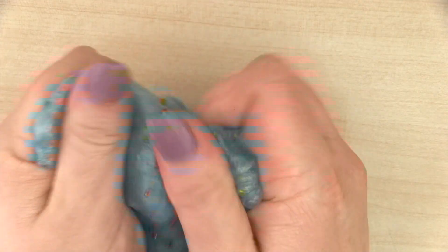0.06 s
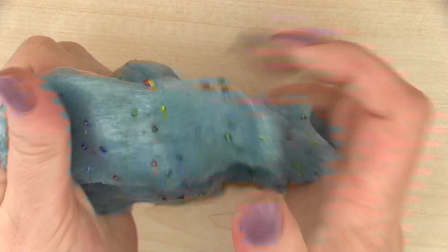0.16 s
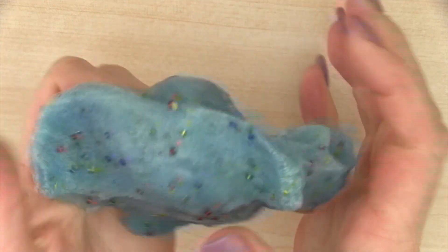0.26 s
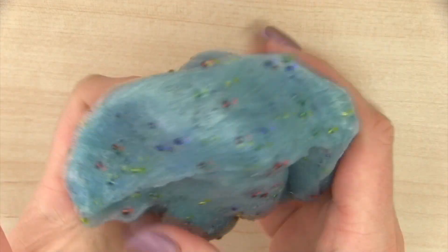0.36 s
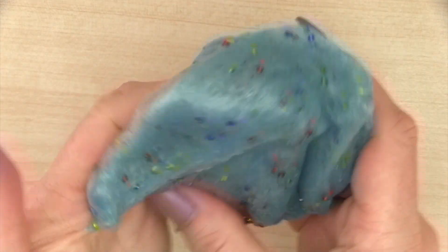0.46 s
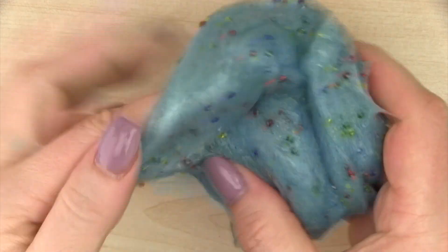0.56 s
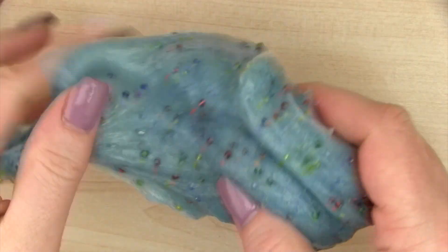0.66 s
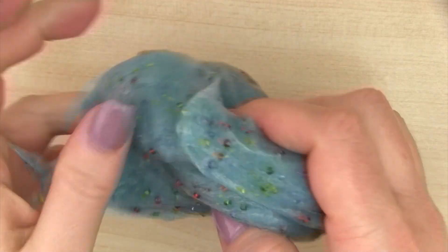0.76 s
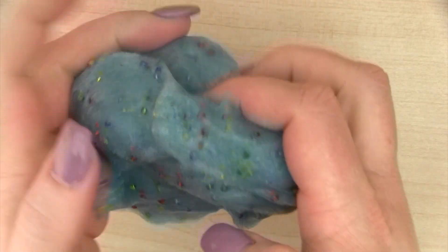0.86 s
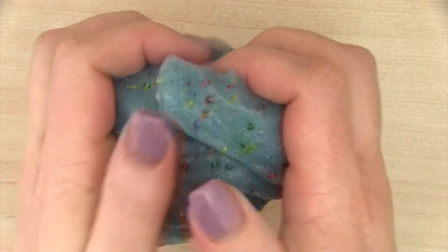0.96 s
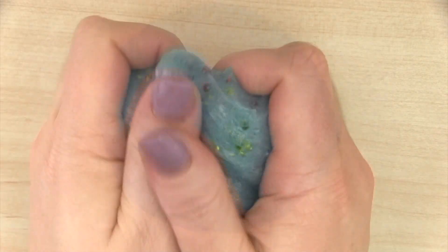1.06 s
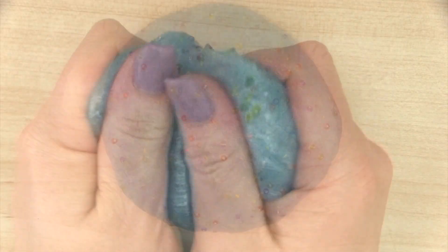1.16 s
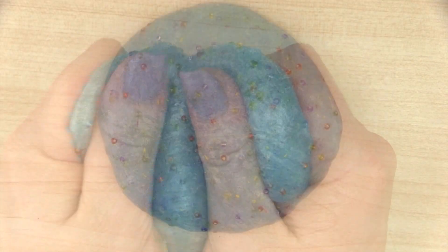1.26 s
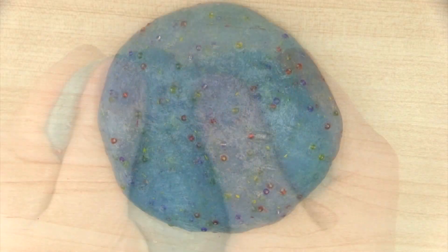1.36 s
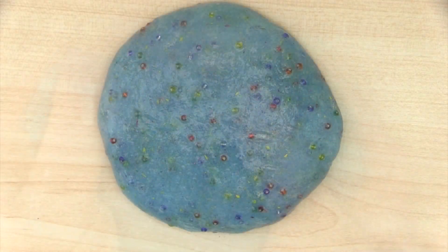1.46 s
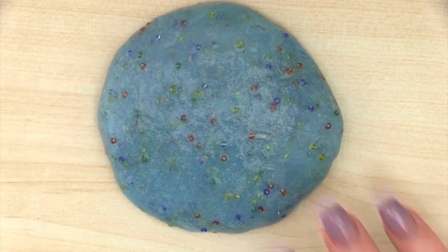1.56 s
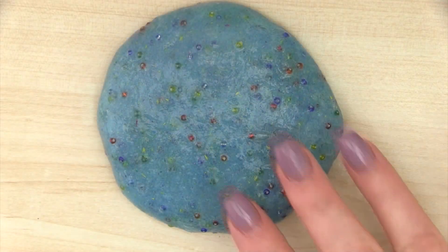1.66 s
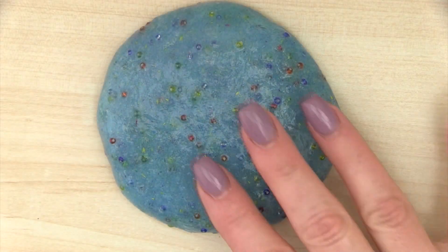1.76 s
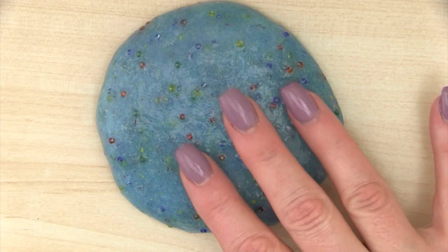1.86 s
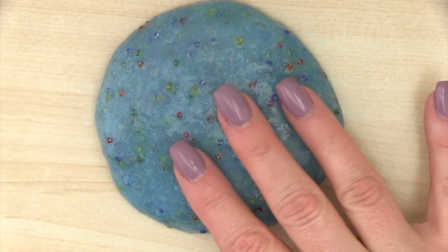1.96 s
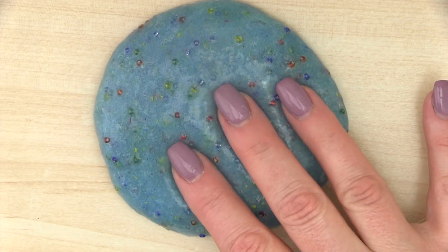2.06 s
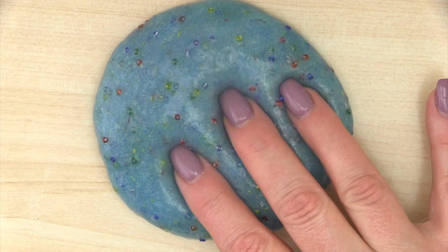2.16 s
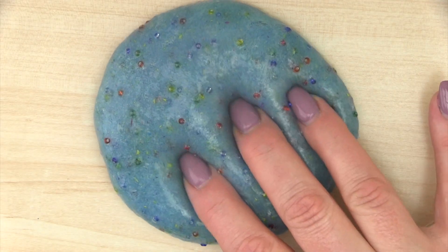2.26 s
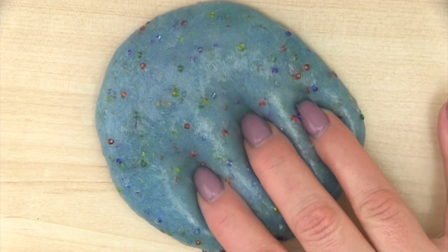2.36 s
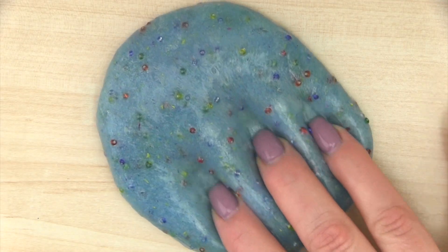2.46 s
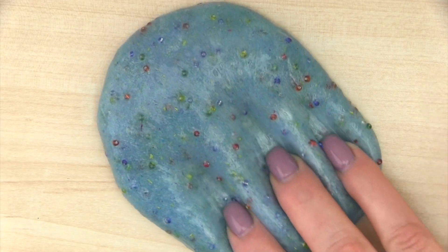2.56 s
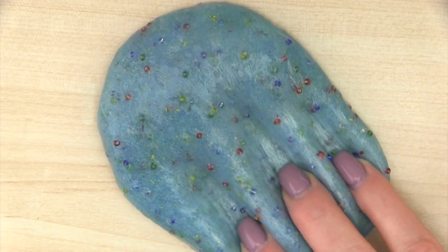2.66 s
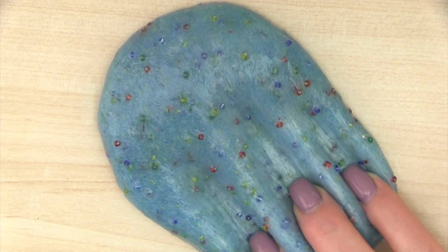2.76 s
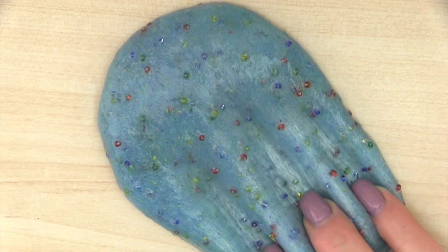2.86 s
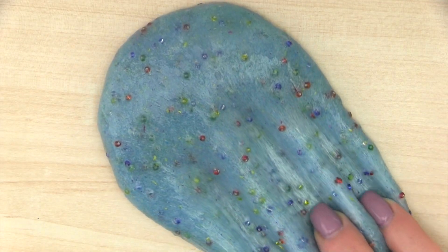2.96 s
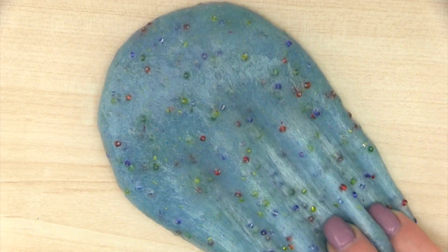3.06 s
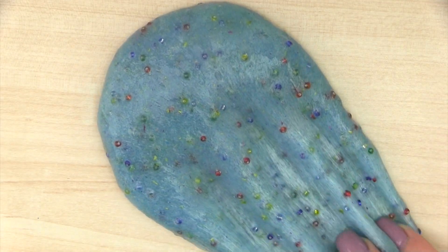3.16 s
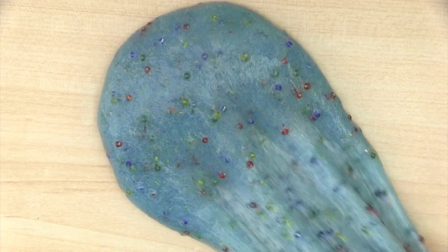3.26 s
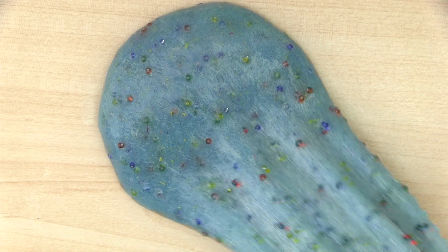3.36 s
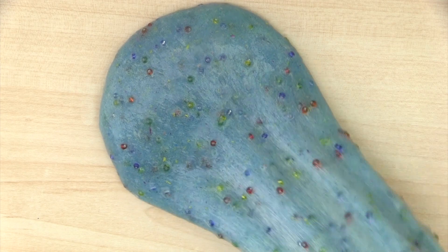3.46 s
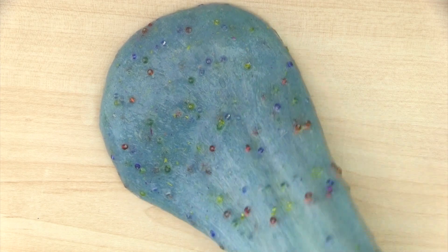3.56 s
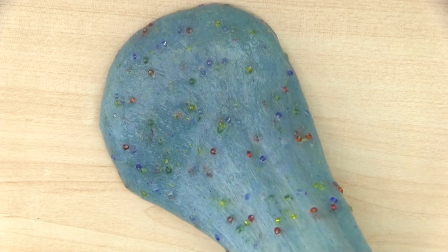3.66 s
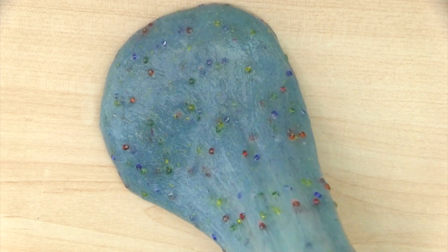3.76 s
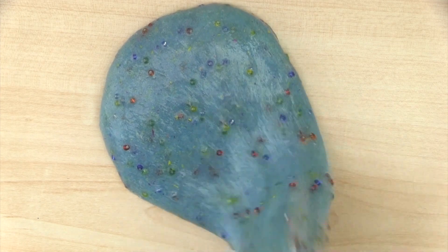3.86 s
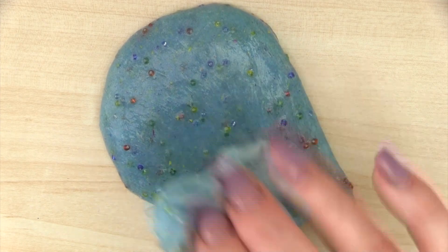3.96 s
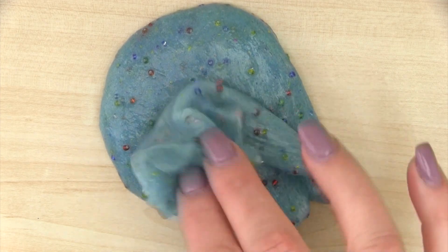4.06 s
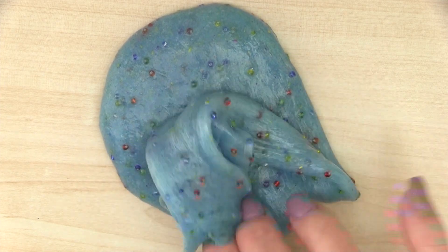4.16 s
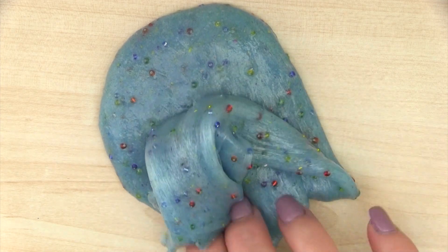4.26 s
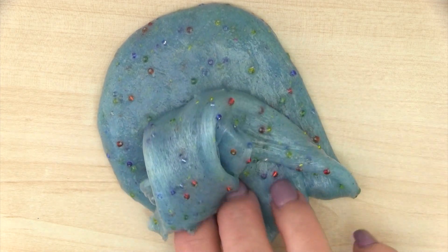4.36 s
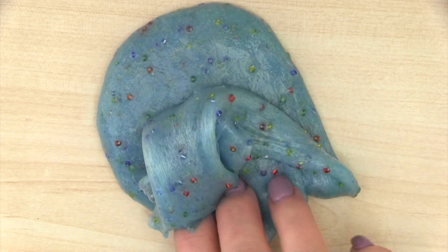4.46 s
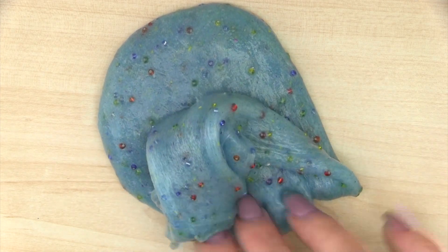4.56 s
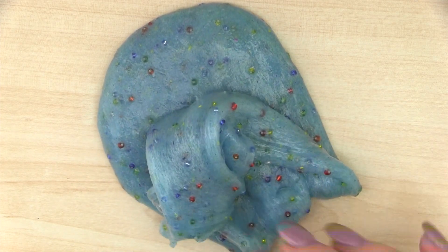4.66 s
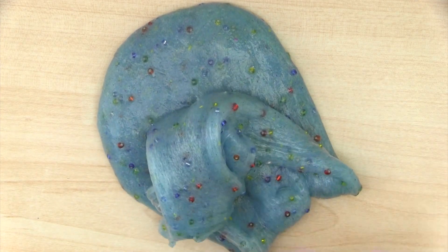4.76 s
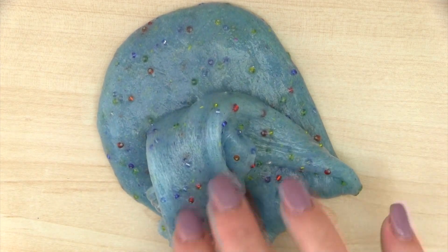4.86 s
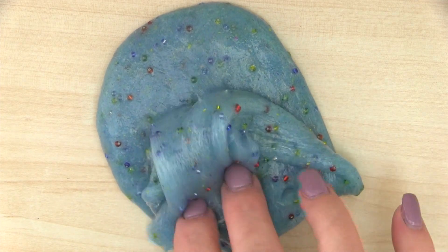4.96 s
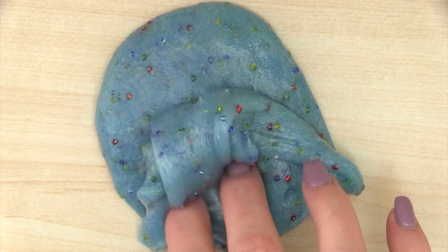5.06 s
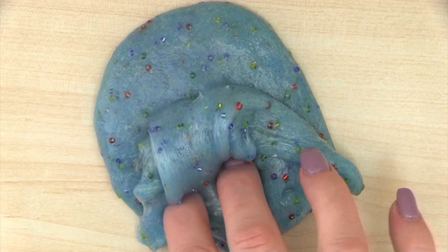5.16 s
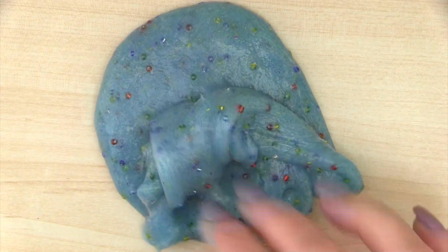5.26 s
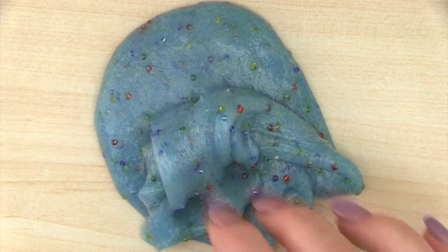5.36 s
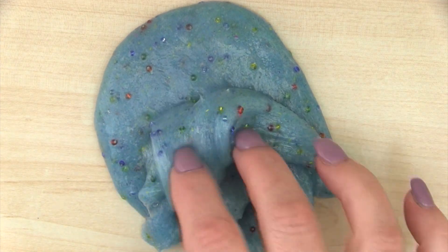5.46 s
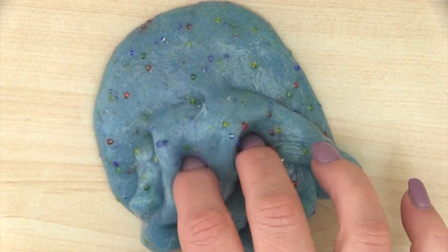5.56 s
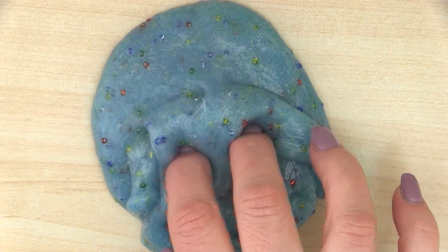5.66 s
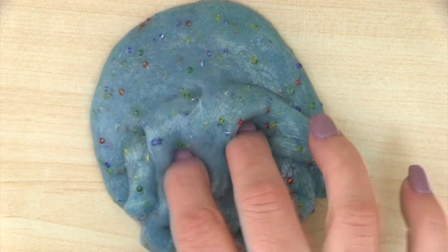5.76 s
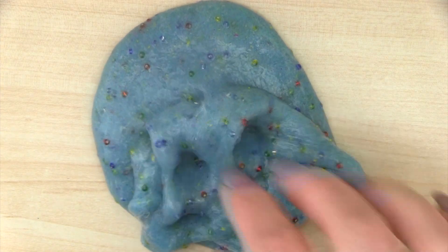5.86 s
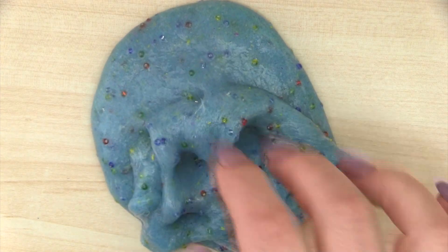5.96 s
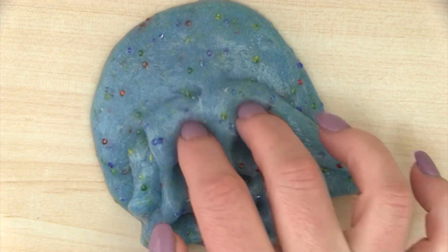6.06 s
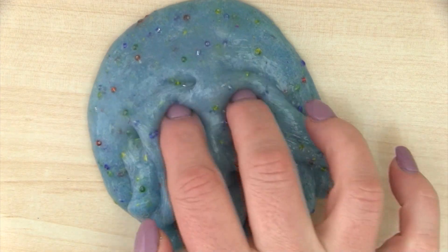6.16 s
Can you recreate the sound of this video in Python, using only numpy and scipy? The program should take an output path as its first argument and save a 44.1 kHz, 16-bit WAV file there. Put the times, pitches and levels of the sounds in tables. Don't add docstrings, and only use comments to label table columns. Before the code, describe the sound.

Close-up beaded slime kneaded in the hands with sharp wet pops and crackles, then quietly stretched and poked on a wooden table.

```python
import sys
import numpy as np
from scipy import signal
from scipy.fft import rfft, irfft, next_fast_len
from scipy.io import wavfile
from scipy.ndimage import uniform_filter1d, map_coordinates

SR = 44100
rng = np.random.default_rng(int(sys.argv[2]) if len(sys.argv) > 2 else 0)


def boost(x):
    u = np.asarray(x, float) / 20
    return 10 ** u


def store_wav(level_fs):
    pcm = np.round(np.clip(np.atleast_2d(level_fs), -1, 1) * 32767)
    wavfile.write(sys.argv[1], SR, pcm.T.astype(np.int16))


N = 274743


def unit(x):
    return x / np.sqrt(np.mean(x ** 2) + 1e-20)


def peaked(rows, db):
    return boost(db)[:, None] * rows / np.abs(rows).max(1, keepdims=True)


def along(points, hz):
    f, v = np.transpose(points)
    return np.interp(np.log(hz + 1), np.log(f + 1), v)


def coloured(x, spectrum):
    m = next_fast_len(N + 8192)
    gain = boost(along(spectrum, np.fft.rfftfreq(m, 1 / SR)))
    return irfft(rfft(x, m) * gain, m)[:N]


def wobble(rate):
    knots = rng.standard_normal(int(N * rate / SR) + 4)
    return map_coordinates(knots, [np.arange(N) * rate / SR])


def resonance(hz, centre_hz, sharpness):
    centre = centre_hz[:, None]
    damping = 1j * hz * centre / sharpness
    return damping / (centre ** 2 - hz ** 2 + damping)


def placed(s, wave):
    where = np.round(s * SR).astype(int)[:, None] + np.arange(wave.shape[1])
    return np.bincount(where.ravel(), wave.ravel(), N + SR)[:N]


# f/Hz, density/dB
AIR_SPECTRUM = [(12, -33), (20, -5.5), (60, -3.5), (81, -7.5), (124, -3.5), (160, -12), (211, -5.5),
                (272, -14), (859, -23.5), (988, -23), (1830, -26), (11700, -28.5), (15000, -29.5),
                (16400, -32.5)]
# f/Hz, density/dB
APART_SPECTRUM = [(12, -29.5), (20, 2.5), (280, -9), (322, -9), (450, -11), (13800, -19.5), (16400, -28)]


def air():
    mains_hz = 60
    common = boost(-69 + 1.1 * wobble(2.1)) * unit(coloured(rng.standard_normal(N), AIR_SPECTRUM))
    hum = boost(-70.5 + 2.32 * wobble(8.4)) * np.sin(2 * np.pi * mains_hz * np.arange(N) / SR)
    apart = boost(-77.0) * unit(coloured(rng.standard_normal(N), APART_SPECTRUM))
    return common + hum + np.array([apart, -apart])


# f/Hz, t60/s
ROOM_DECAY = [(300, 0.74), (1500, .25), (3500, 0.41), (7000, 0.08), (14000, 0.076)]
# f/Hz, level/dB
ROOM_COLOUR = [(150, -39), (350, -2), (1500, -4.5), (3500, -5), (7000, -4.5), (14000, -14)]
# delay/s, level/dB
REFLECTIONS = [(.0022, -21.5), (.0035, -19), (.0046, -14.5), (.0087, -25.5)]


def room(x):
    out, step = np.zeros(N + SR), SR // 10
    smear_decay = boost(-60 * np.arange(120) / SR / .0012)
    for start in range(0, N, step):
        hz, t, z = signal.stft(rng.standard_normal(SR // 4), SR, nperseg=128)
        hz = hz[:, None]
        fade = boost(along(ROOM_COLOUR, hz) - 60 * t / along(ROOM_DECAY, hz))
        fade += boost(12.0 - 60 * t * (1 + hz / 6000) / 0.077) * (hz > 500)
        tail = signal.istft(z * fade, SR, nperseg=128)[1]
        tail *= boost(-10.0) / np.linalg.norm(tail)
        for delay, db in REFLECTIONS:
            smear = rng.standard_normal(120) * smear_decay
            tail[round(delay * SR):][:120] += boost(db) * smear / np.linalg.norm(smear)
        wet = signal.fftconvolve(x[start:start + step], tail)
        out[start + 30:][:len(wet)] += wet
    return out[:N]


# f/Hz, t60/s
TABLE_MODES = [(208, 0.13), (130.85, 0.056), (29.56, 0.2018)]
# t/s, rise/s, top level/dB, frame level/dB, sway level/dB
TABLE_PUSHES = [(0.027, 0.0052, -53, -47.5, -58), (0.201, 0.0091, -59, -48, -66),
                (0.661, 0.018, -74, -41, -65), (4.108, 0.011, -70.5, -58.5, -55.5),
                (4.345, 0.0064, -60.5, -57.5, -70), (4.707, 0.048, -25, -21, -47),
                (5.361, 0.011, -50, -37.5, -49), (5.38, 0.033, -31.5, -22.5, -44),
                (5.52, 0.042, -76, -71, -49), (5.6, 0.034, -71, -67, -47.5),
                (5.709, 0.034, -72.5, -62.5, -59), (5.82, 0.037, -69.5, -68, -56),
                (5.953, 0.0066, -45.5, -37, -46), (5.985, 0.019, -51, -29.5, -69.5),
                (6.015, 0.02, -60, -37.5, -68), (6.05, 0.024, -67, -43, -70),
                (6.091, 0.037, -70.5, -57, -58)]


def table_pushes():
    out, t = np.zeros(N + SR), np.arange(SR // 2) / SR
    for s, rise, *levels_db in TABLE_PUSHES:
        swell = 1 - np.exp(-(t / rise) ** 2)
        ring = 0
        for db, (hz, t60) in zip(levels_db, TABLE_MODES):
            ring = ring + boost(db + 5 - 60 * t / t60) * np.sin(2 * np.pi * hz * t)
        out[round(s * SR):][:len(t)] += swell * ring
    return out[:N]


# f/Hz, t60/s
SUCTION_MODES = [(310, 0.03), (380, 0.059), (440, 0.02), (530, 0.027)]
# t/s, rise/s, level/dB
AIR_GULPS = [(0.029, 0.0034, -29.5), (0.197, 0.014, -36.5), (.66, 0.03, -45), (.94, .011, -60),
             (1.188, 0.001, -41.5), (1.212, 0.0082, -41.5), (1.251, 0.0021, -53), (1.288, .0032, -59),
             (2.368, 0.01, -50), (4.695, 0.0082, -34), (4.716, 0.011, -32), (4.745, .025, -39.5),
             (5.361, 0.0071, -32), (5.375, 0.0053, -31.5), (5.41, 0.017, -36), (5.895, 0.0038, -48.5),
             (5.949, 0.0092, -29), (5.982, 0.0034, -50), (6.01, .02, -53)]


def suction_gulps():
    out, t = np.zeros(N + SR), np.arange(SR // 2) / SR
    for s, rise, suction_db in AIR_GULPS:
        swell = 1 - np.exp(-(t / rise) ** 2)
        luck = rng.standard_normal((len(SUCTION_MODES), 3))
        for (hz, t60), (pitch, size, phase) in zip(SUCTION_MODES, luck):
            fade = boost(suction_db - 3.5 + 3.2 * size - 60 * t / t60)
            gulp = fade * np.sin(2 * np.pi * hz * np.exp(.06 * pitch) * t + 2 * phase)
            out[round(s * SR):][:len(t)] += swell * gulp
    return out[:N]


# t/s, hold/s, release for 30 dB/s, level/dB, wetness/dB (squelch up, fizz down)
KNEADING_TEARS = [(0, 0.00096, 0.071, -39, 4), (0.03, 0.005, 0.11, -40.5, 2.5),
                  (.06, 0.0089, 0.2, -57.5, 0), (0.162, 0.06, 0.29, -55.5, 2),
                  (0.239, 0.074, 0.069, -63, 5.5), (.31, 0.024, 0.086, -80, 19),
                  (0.339, 0.045, 0.044, -69, 4.5), (.55, 0.092, 0.095, -66.5, 3),
                  (0.612, 0.076, 0.083, -61.5, 6), (.7, 0.072, 0.13, -71.5, 7.5),
                  (.77, 0.038, 0.32, -66, 3), (.84, 0.1, 0.088, -67, 1), (0.93, 0.034, 0.067, -61.5, 7),
                  (0.999, 0.029, 0.26, -71.5, -0.5), (1.189, 0.02, 0.14, -60, -1.5),
                  (1.234, 0.0089, 0.11, -53, 6), (1.288, 0.0092, 0.085, -47, -0.5)]
# t/s, hold/s, release for 30 dB/s, level/dB, wetness/dB
POKING_TEARS = [(2.33, 0.064, 0.095, -81, 11.5), (3.14, 0.059, 0.29, -70, -8), (3.25, 0.11, .3, -70.5, 4),
                (3.333, 0.0082, 0.2, -69, -2), (3.338, 0.22, 0.17, -74.5, 7.5), (3.5, .05, 0.48, -76, -6),
                (4.04, 0.068, 0.34, -70, 1), (4.179, 0.027, .25, -74.5, 2.5),
                (4.345, 0.0055, 0.068, -82.5, 17.5), (4.659, 0.021, .05, -63.5, 6.5),
                (4.695, 0.0084, 0.06, -52, -2), (4.721, 0.013, 0.078, -69, 11),
                (5.325, 0.011, 0.098, -74.5, 13.5), (5.366, 0.0074, 0.069, -52, 1),
                (5.895, 0.034, 0.045, -75, 10), (5.95, 0.0041, 0.044, -45, -5.5),
                (5.985, 0.022, 0.13, -75, 9)]


def pulls():
    rest_db, fizz_db, squelch_db = -83.5, -3, -2.5
    linger_db, linger = -22, 4.1
    release_speed = np.array([[1], [1.7], [1.7]])
    power = np.full((3, N + SR), boost(rest_db) ** 2)
    t = np.arange(SR) / SR
    for s, hold, release, db, wet_db in KNEADING_TEARS + POKING_TEARS:
        grip = np.minimum(1, t / (.003 + .4 * hold)) ** 2
        gone = np.maximum(0, t - hold) / release * release_speed
        shape = grip * (boost(-30 * gone) + boost(linger_db - 30 * gone / linger))
        levels_db = [[db], [db + fizz_db - wet_db], [db + squelch_db + wet_db]]
        power[:, round(s * SR):][:, :SR] += (boost(levels_db) * shape) ** 2
    return np.sqrt(power[:, :N])


def threads(spectrum, rate, spread_db, smooth, patchy_db):
    snap = rng.random(N) < rate / SR * boost(2.5 * wobble(90))
    size = rng.choice([-1, 1], N) * boost(spread_db * np.minimum(rng.exponential(1, N), 4))
    grains = unit(snap * size) + smooth * rng.standard_normal(N)
    z = signal.stft(grains, nperseg=128)[2]
    field = uniform_filter1d(rng.standard_normal(z.shape), size=3, axis=0)
    field = uniform_filter1d(field, size=5, axis=1)
    patchy = signal.istft(z * boost(patchy_db * unit(field)), nperseg=128)[1][:N]
    return unit(coloured(patchy, spectrum))


# f/Hz, level/dB
CRACKLE_SPECTRUM = [(1400, -24.5), (2200, -6.5), (3000, -5), (3650, 0.5), (4500, -6.5), (6000, -7.5),
                    (10000, -21)]
# f/Hz, level/dB
FIZZ_SPECTRUM = [(4000, -25), (6800, 0), (9000, -2), (13000, -4.5), (15500, -8), (17000, -24)]
# f/Hz, level/dB
SQUELCH_SPECTRUM = [(180, -17.5), (330, -6), (700, -6.5), (1200, -3), (1900, -9), (2400, -8.5), (3200, -19)]


def tearing():
    crackle_gain, fizz_gain, squelch_gain = pulls()
    clumps = .55 * wobble(110)
    crackle = crackle_gain * boost(3 * clumps) * threads(CRACKLE_SPECTRUM, 2600, 2.6, 0.97, 2.6)
    fizz = fizz_gain * boost(1.5 * clumps) * threads(FIZZ_SPECTRUM, 2000, 3.4, .6, 2.2)
    squelch = squelch_gain * boost(0.71 * clumps) * threads(SQUELCH_SPECTRUM, 2100, 2.5, 2.8, 5.2)
    return crackle + fizz + squelch


# t/s,
# f/Hz, level/dB, sharpness/1
SLIME_RINGS = [(.0002, 6800, -24, 0.32), (0.0154, 5570, -29, 1.5), (.0235, 7200, -18, 2.2),
               (0.0295, 2385, -8, 1.75), (0.0291, 3398, 0, 1.6), (0.031, 1480, -15, 2.05),
               (0.0506, 8530, -13, 4.2), (0.0504, 11700, -20, 3.2), (.207, 2100, -40.5, 4.5),
               (.2305, 3500, -42.5, 7.6), (.306, 4440, -41, 3.3), (.792, 1560, -51, 2.2),
               (.8, 4700, -51, 3), (.818, 2500, -50, 4.7), (.885, 4700, -45.5, 3.5),
               (1.171, 3140, -52, 2.3), (1.1883, 960, -47.5, 0.67), (1.1887, 2400, -40, 2.4),
               (1.1886, 3460, -20, 3.6), (1.29, 12470, -8.5, 2.6), (1.2889, 2890, -23, 1.8),
               (1.3897, 11500, -20.5, 3), (1.24, 4600, -34, 4), (1.2545, 3810, -27, 2.2),
               (1.281, 7530, -44, 3), (1.2846, 1785, -36, 1.4), (1.3155, 5840, -37, 1.4),
               (3.218, 3700, -51.5, 4), (3.246, 1186, -59.5, 3.3), (3.278, 1244, -56, 1.9),
               (3.334, 1194, -41, 1.74), (3.392, 1510, -55, 3), (3.415, 1300, -58, 2),
               (3.447, 1890, -49.5, 1.4), (3.453, 1210, -60, 2.2), (3.576, 1537, -60, 4.8),
               (4.699, 3550, -37, 5), (4.708, 1200, -44.5, 3.2), (5.3242, 1288, -42.5, 3.5),
               (5.3614, 1075, -33, 2.5), (5.3728, 3840, -33.5, 6.6), (5.6, 1246, -70.5, 2.24),
               (5.676, 1256, -66.5, 2), (5.911, 1070, -47, 2.7), (5.9396, 1150, -47, 3.5),
               (5.95, 1160, -33.5, 6.1), (5.9505, 3900, -32.5, 6.7), (5.95, 2720, -33, 5),
               (1.1888, 5600, -27, 2.1), (1.1883, 7500, -20, 4.5), (1.1938, 6500, -27, 3),
               (1.1885, 1730, -41, 4), (1.208, 14000, -47, 2), (1.2186, 3040, -36.5, 3.3),
               (1.2195, 5470, -35, 2.2), (1.2365, 12000, -46, 1), (1.25, 14500, -38, 2.5),
               (1.2745, 9000, -46, 1), (1.2897, 11460, -13, 3), (1.2896, 4870, -25, 3.7),
               (1.2941, 13800, -28, 5), (1.306, 13000, -28, 1.5), (3.3345, 2160, -49, 5.3),
               (3.334, 6900, -56, 2.1), (3.358, 2000, -54, 6.2), (3.362, 3800, -56, 4),
               (3.368, 1950, -55, 5.1), (3.378, 1900, -60, 5), (3.385, 1200, -60, 3), (3.404, 1700, -57, 2),
               (3.432, 1500, -60, 3), (3.47, 1700, -59, 5.2), (3.5, 3700, -61, 3), (3.515, 3300, -59, 6.5),
               (3.53, 3500, -59, 3.7), (4.3418, 7000, -45, 1.6), (4.345, 1890, -45.5, 2.1),
               (4.346, 3810, -47.5, 3.6), (4.3459, 1190, -47, 2.3), (4.351, 1420, -59, 6.3),
               (4.3925, 1200, -55.5, 1.4), (4.428, 2190, -55, 1.7), (4.6615, 10000, -55, 1),
               (4.676, 9500, -52, 0.85), (4.6775, 3500, -53, 1.9), (4.6935, 9000, -41, 2),
               (4.707, 12500, -34, 2), (4.712, 4520, -45, 3), (4.718, 4500, -46, 2), (4.727, 4200, -51, 3),
               (5.366, 9000, -40, 1.04), (5.379, 4160, -47, 4.6), (5.388, 4000, -47, 5),
               (5.955, 380, -42, 2.1), (5.96, 500, -42, 3.5), (5.96, 14500, -35, 3.3),
               (5.973, 12000, -44, 1),
               (0.0394, 3200, -30, 4.9), (0.0494, 3430, -29, 1.5), (0.056, 8800, -26, 3),
              (.2243, 5000, -41, 2.5), (.2248, 8500, -41, 1.8), (0.251, 5000, -38, 3),
              (.257, 6500, -39, 2.2), (.3, 5500, -46, 3), (.322, 1000, -56.5, 4.5), (.346, 7500, -49, 1.94),
              (.622, 1500, -53, 2), (0.637, 8500, -46, 2), (.665, 3500, -43, 3.4), (.6725, 9000, -49, 1.5),
              (.673, 2830, -44, 4), (.7355, 4300, -48, 2.8), (.7357, 10000, -39, 1.5),
              (.7455, 8500, -47, 1.5), (.7538, 9000, -45, 1), (.761, 1500, -54, 3.3),
              (0.767, 10800, -45, 3), (.8595, 3000, -55, 1), (.953, 6500, -45, 2), (0.961, 3470, -53, 3.6),
              (.967, 11400, -42, 2.2), (.978, 3500, -52, 5), (1.0137, 6000, -43, 1.2),
              (1.03, 4000, -53.5, .8), (1.056, 5523, -57, 2), (2.3357, 3470, -53.5, 3.5),
              (2.337, 1520, -59, 2.6), (2.36, 3900, -48.5, 3.5), (2.3606, 1300, -55, 2.9),
              (3.1273, 3690, -55.5, 3), (3.172, 5500, -48, 2.2), (3.1755, 11500, -47, 1.8),
              (3.198, 12950, -48, 2), (3.2013, 7480, -37, 1.5), (3.209, 12000, -43, 2),
              (3.247, 6540, -48, 1.54), (3.266, 10300, -48.5, 2.2), (3.311, 9500, -50.5, 1.46),
              (4.703, 882, -50, 4), (4.694, 14900, -33, 2), (.6252, 3300, -43, 3), (4.7, 14940, -42, 3),
              (1.3951, 12500, -40.5, 2), (0.0307, 7800, -19.5, 2)]


def ringing(size=1024):
    s, centre_hz, db, sharpness = np.transpose(SLIME_RINGS)
    hz = np.fft.rfftfreq(size, 1 / SR)
    wave = peaked(-irfft(resonance(hz, centre_hz, sharpness[:, None]) ** 2), db)
    wave[:, size // 2:] = 0
    return placed(s, wave)


# t/s, pocket f/Hz, pocket level/dB, film f/Hz, film level/dB
KNEADED_POPS = [(.0045, 4870, -21.5, 7500, -23), (.0152, 5650, -26.5, 9200, -30),
                (.0233, 2800, -30.5, 7400, -26.5), (.0294, 2850, -26, 7600, -23),
                (.0503, 3600, -23.5, 10600, -17.5), (.069, 3530, -33.5, 10950, -34.5),
                (.2011, 3360, -41, 6500, -30.5), (.2295, 2940, -34, 7530, -65),
                (.6244, 4150, -39, 9700, -50.5), (.7339, 4390, -48, 8900, -44),
                (.938, 4300, -42, 7430, -40), (1.015, 4000, -39, 7050, -43.5),
                (1.0471, 3830, -50.5, 11200, -41), (1.1882, 4280, -19.5, 7040, -23.5),
                (1.2186, 3600, -36, 9100, -47.5), (1.2393, 4440, -36, 10000, -29.5),
                (1.2537, 5000, -29, 10500, -27.5), (1.2781, 6300, -27, 8220, -24),
                (1.2886, 4900, -19, 11800, -19.5), (1.2988, 3360, -41, 10960, -28.5),
                (1.3663, 4300, -37, 6560, -35), (1.3895, 5050, -33.5, 11430, -26.5)]
# t/s, pocket f/Hz, pocket level/dB, film level/dB, hollow level/dB
POKED_POPS = [(2.336, 3480, -59, -68.5, -66), (2.36, 3960, -56.5, -69, -61), (2.377, 2790, -51, -63.5, -59),
              (3.1845, 3690, -47.5, -27, -61), (3.3339, 3700, -34, -44, -53), (3.3484, 2170, -49, -61, -64),
              (3.4634, 2683, -52, -62, -54), (3.96, 2330, -68.5, -75.5, -63),
              (4.3459, 2900, -53.5, -66, -56), (4.3718, 4860, -45.5, -70.5, -56.5),
              (4.428, 3600, -52, -47.5, -68), (4.659, 3900, -56, -52, -66), (4.6931, 4240, -27.5, -40, -48),
              (4.699, 5000, -37, -34.5, -47), (4.702, 4500, -34, -39, -45), (4.7068, 3160, -52, -49, -60),
              (5.027, 5130, -53, -59.5, -55), (5.325, 2680, -57, -72, -63),
              (5.3606, 4000, -24, -18.5, -38.5), (5.3743, 4490, -31.5, -49, -45),
              (5.9115, 2276, -58, -73.5, -58), (5.9385, 3750, -37.5, -26, -46),
              (5.9495, 3150, -23, -26, -50), (5.9514, 5000, -46, -30.5, -37),
              (5.9557, 6000, -36, -33.5, -53), (5.9638, 4260, -37, -41.5, -37.5),
              (5.9652, 4220, -27, -36.5, -40)]
# t/s, pocket level/dB, film level/dB
BEAD_TICKS = [(.0098, -41, -34), (.2224, -59, -52), (.255, -48, -37), (.3076, -52.5, -60),
              (.3827, -53, -45), (.5646, -52, -45.5), (.6363, -43, -54), (.6649, -46, -57),
              (.7054, -57, -63), (.7664, -67, -50), (.793, -50, -46), (.8152, -52, -69),
              (.8627, -61, -44.5), (.8836, -47, -55), (.9125, -55, -68), (.9566, -53, -41),
              (1.068, -62, -60), (1.2282, -58, -34), (1.3062, -45, -39), (1.339, -56, -47),
              (1.4821, -68, -51), (2.7589, -62, -48), (3.127, -54, -46.5), (3.1304, -58, -55),
              (3.647, -49.5, -62.5), (4.0737, -53.5, -61), (4.0905, -59, -66), (4.3417, -49, -54.5),
              (4.675, -52.5, -56), (5.3551, -76, -45)]


def pockets(count=14):
    peel = rng.standard_normal((count, 3))
    after = .0105 * (np.arange(count) + 0.083 * peel[:, 0])
    peel_film_db = -42.5 - 57 * after + 2 * peel[:, 1]
    peel_pocket_db = peel_film_db - 15 + 5 * peel[:, 2]
    ticks = BEAD_TICKS + list(zip(3.162 + after, peel_pocket_db, peel_film_db))
    luck = rng.standard_normal((len(POKED_POPS) + len(ticks), 2))
    pocket_hz = 4000 * np.exp(0.3128 * luck[:, 0])
    film_hz = 9200 * np.exp(0.25 * luck[:, 1])
    free = list(KNEADED_POPS)
    for (s, db, top_db), hz, top_hz in zip(ticks, pocket_hz[::-1], film_hz[::-1]):
        free.append((s, hz, db, top_hz, top_db))
    rows = []
    for s, hz, db, top_hz, top_db in free:
        hollow_db = db - 18 - 7 * np.log2(hz / 3000)
        rows.append((s, hz, top_hz, db, top_db, hollow_db))
    for (s, hz, db, top_db, hollow_db), top_hz in zip(POKED_POPS, np.clip(film_hz, 8000, 10500)):
        rows.append((s, hz, top_hz, db, top_db, hollow_db))
    return np.transpose(rows)


def pops(size=1024):
    s, pocket_hz, film_hz, pocket_db, film_db, hollow_db = pockets()
    t, hz = np.arange(size) / SR, np.fft.rfftfreq(size, 1 / SR)
    luck = rng.standard_normal((len(s), size + 3))
    ragged = .1 * luck[:, 3:] * boost(-60 * t / (.004 * np.exp(.25 * luck[:, :1])))

    def later(delay, db):
        return boost(db) * np.exp(-2j * np.pi * hz * delay)

    cupped = ((s > 1.1) & (s < 1.45))[:, None]
    palm_stretch = np.exp(0.11 * luck[:, 2:3])
    palms = later(.00048 * palm_stretch, 3) + later(.0012 * palm_stretch, -5)
    rip = later(0.0011 * np.exp(0.27 * luck[:, 2:3]), -11)
    puff = rfft((t == 0) + ragged) * (1 + np.where(cupped, palms, rip))

    def rung(centre_hz, db, sharpness):
        return peaked(irfft(puff * resonance(hz, centre_hz, sharpness) ** 2), db)

    film = rung(film_hz, film_db, 1.05)
    pocket = rung(pocket_hz, pocket_db, 1.15)
    hollow = rung(1250 * np.exp(0.31 * luck[:, 1]), hollow_db - 1.5, 1.3)
    wave = film - pocket + hollow
    wave[:, size // 2:] = 0
    return placed(s, wave)


def scene():
    burst, tear = pops() + ringing(), tearing()
    return burst + tear + room(burst + 0.13 * tear) + table_pushes() + suction_gulps() + air()


def low_pass(x):
    return signal.sosfilt(signal.butter(12, 16500, fs=SR, output="sos"), x)


# f/Hz, level/dB
MIC_RESPONSE = [(20, 0), (13000, 0), (15200, -1), (15800, -4.5), (16400, -17), (16900, -45)]


def record(dry):
    mix = np.array([coloured(channel, MIC_RESPONSE) for channel in dry])
    return low_pass(mix)


dry = scene()
out = record(dry)
store_wav(out)
```